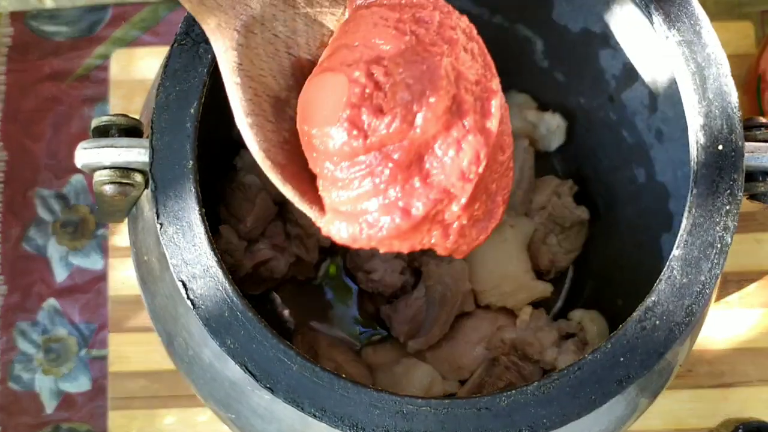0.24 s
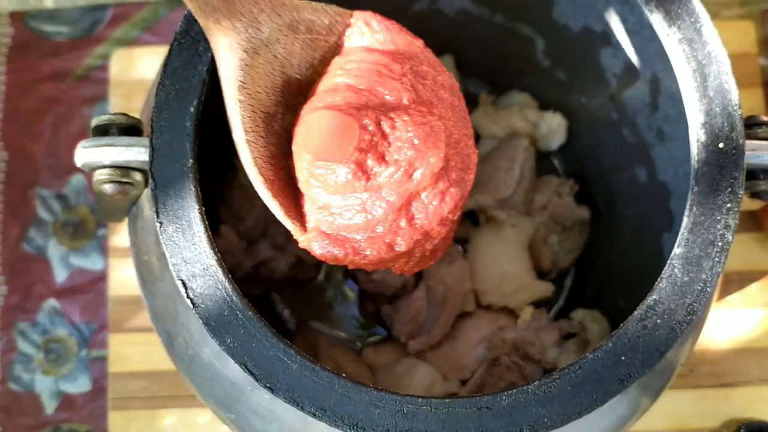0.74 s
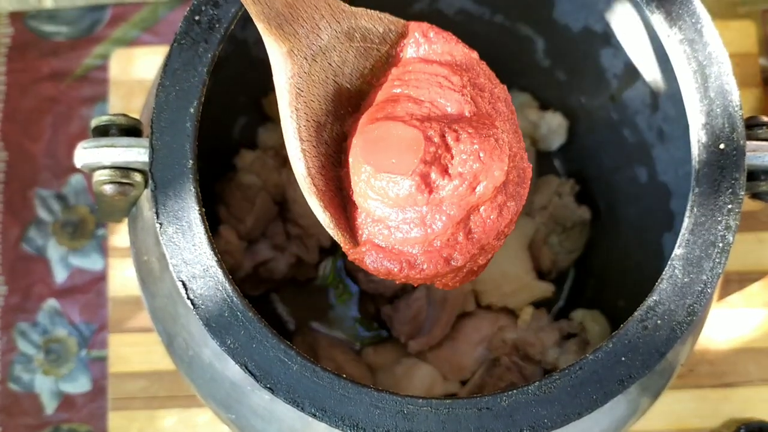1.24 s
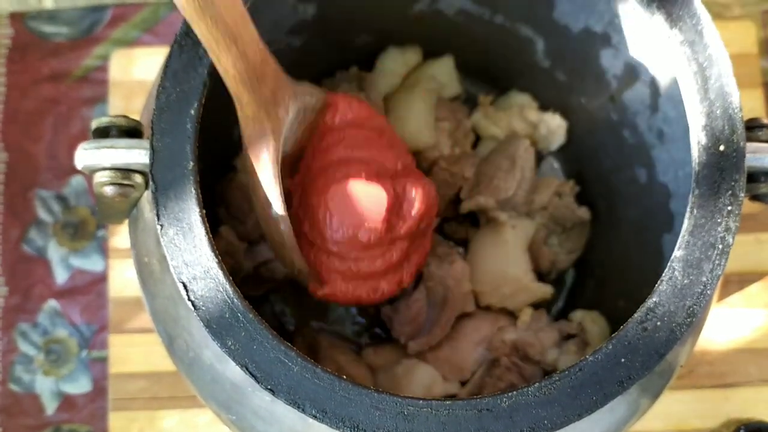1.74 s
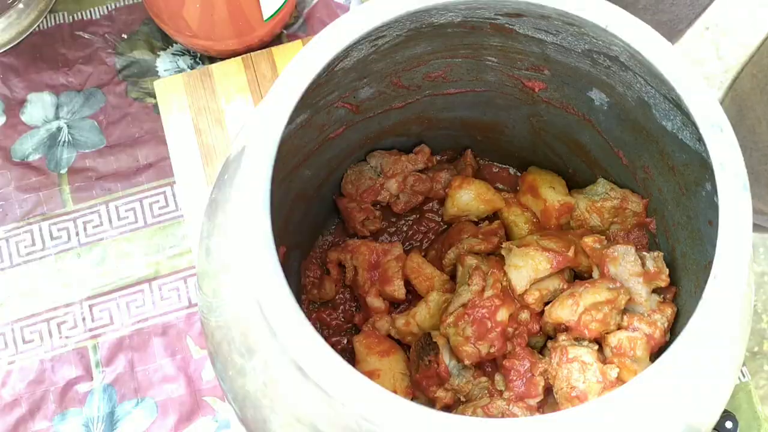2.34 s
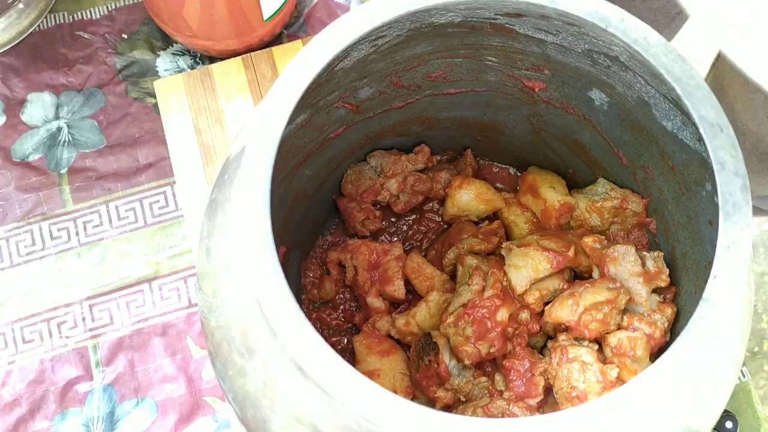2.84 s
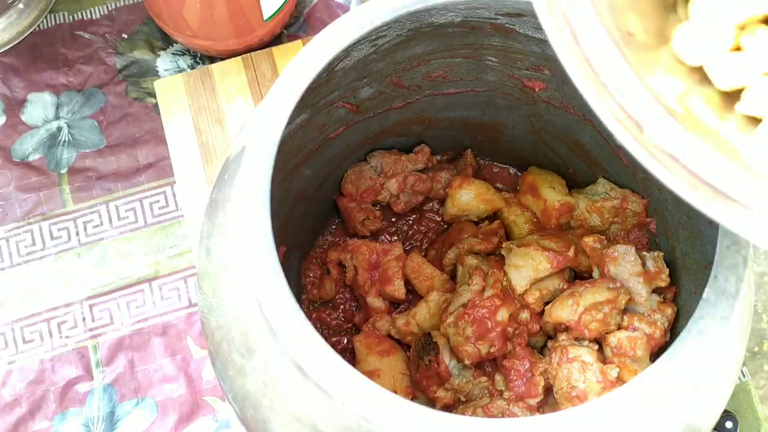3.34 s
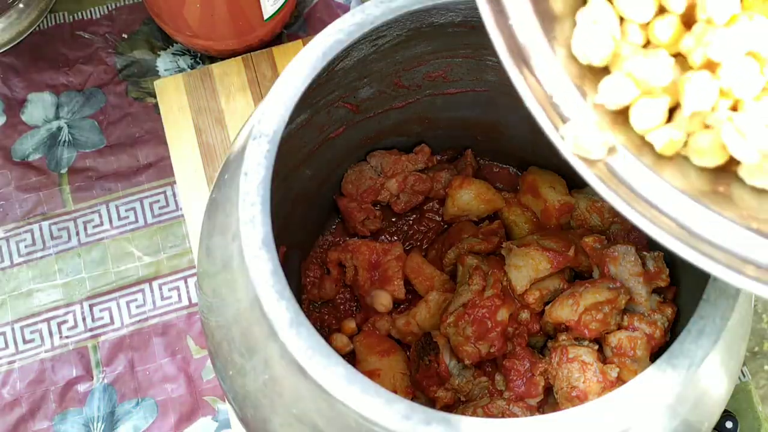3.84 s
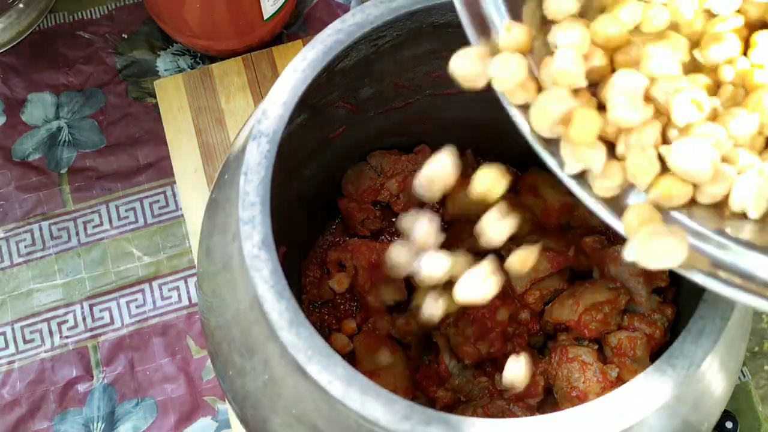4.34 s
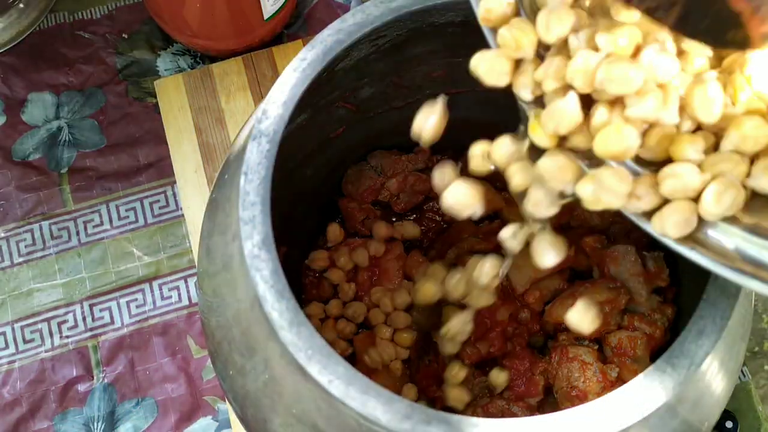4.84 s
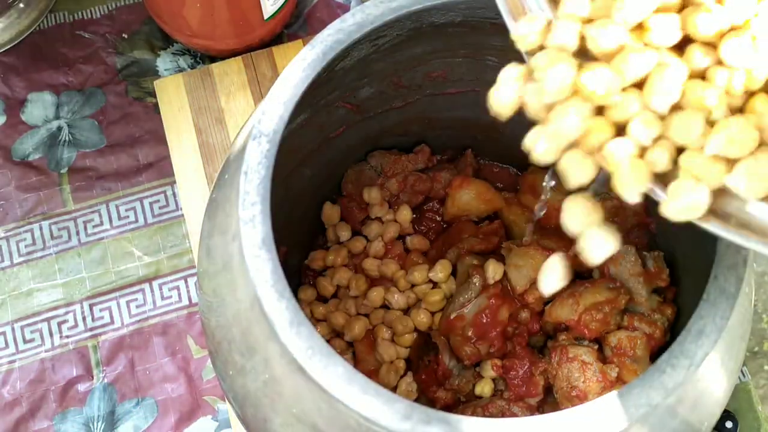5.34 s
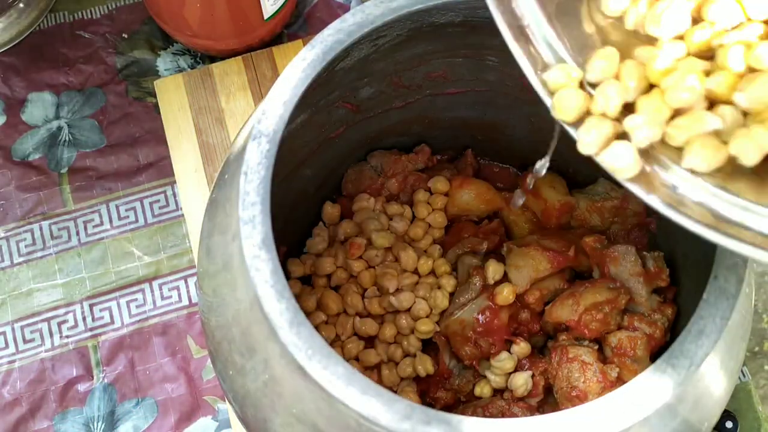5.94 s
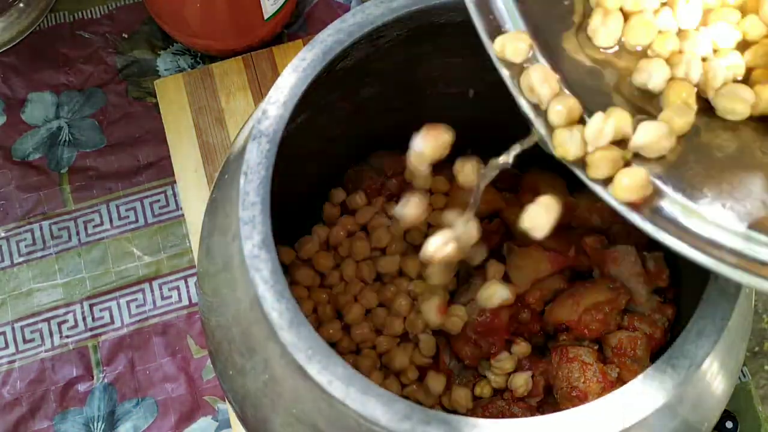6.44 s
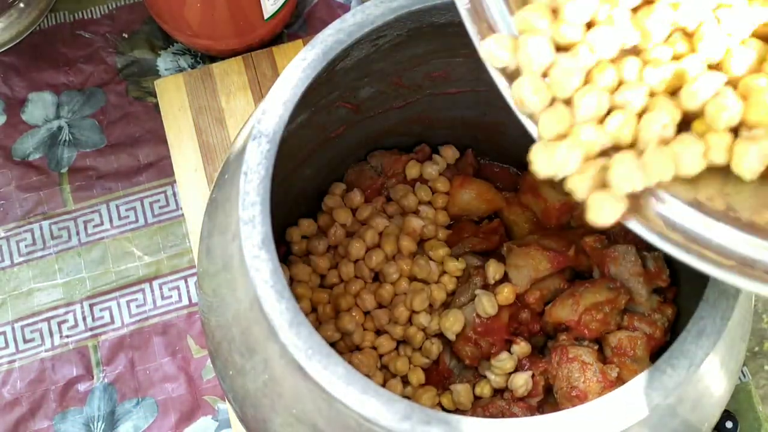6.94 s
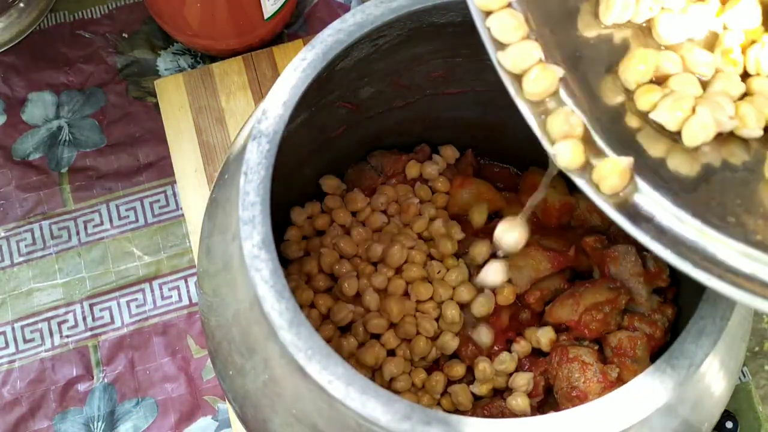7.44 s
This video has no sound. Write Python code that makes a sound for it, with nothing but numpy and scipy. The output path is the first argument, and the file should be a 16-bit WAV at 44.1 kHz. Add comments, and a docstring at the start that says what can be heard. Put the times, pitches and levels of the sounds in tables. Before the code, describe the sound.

A wooden spoon bumps dully in a heavy cooker, thick paste slaps and crackles, then wet chickpeas are scooped from a steel bowl and tumble in.

```python
"""A wooden spoon bumps dully about a pressure cooker and slaps a lump of tomato paste onto meat, which crackles.
Then it scoops soaked chickpeas from a steel bowl: it ploughs through wet peas, knocks on steel and squeaks, and
the peas tumble into the pot with dull thuds. Faint open air and a low rumble run throughout; the sound is close.
Blows are decaying modes plus a noise crack; peas, films and grit are clouds of random grains and pings,
filtered and driven by stroke envelopes."""
import sys
import numpy as np
from scipy import signal
from scipy.fft import rfft, irfft, next_fast_len
from scipy.io import wavfile
from scipy.ndimage import map_coordinates

SR = 44100
rng = np.random.default_rng(int(sys.argv[2]) if len(sys.argv) > 2 else 0)


def transcribe(signal):
    """Save signal, clipped to [-1, 1], as a 16-bit WAV file at the path in sys.argv[1]."""
    frames = np.atleast_2d(signal).T
    limited = np.clip(frames, -1, 1)
    pcm = np.round(limited * 32767).astype(np.int16)
    wavfile.write(sys.argv[1], SR, pcm)


N = 339125

# bands of a blow (thump, body, clack, crack): low_hz, high_hz
BLOW_BANDS_HZ = [(50, 300), (300, 900), (900, 2300), (2300, 11300)]
# dull blows of loaded spoon and paste at the cooker:
# start_s, strength_db (relative), favoured_hz, contact_s, left_minus_right_db
BUMPS = [(0.4991, -29.5, 760, 0.00046, 5), (1.119, -26.5, 204, 0.0019, 3.5),
         (1.413, -33.5, 556, 0.0011, 6.5), (1.419, -41, 395, 0.00022, -1), (1.434, -35, 327, 0.0012, 4),
         (1.533, -41, 337, 0.0004, -3.5), (1.576, -33, 427, 0.00035, 3.5),
         (1.587, -39.5, 397, 0.00014, 1.5), (1.627, -20.5, 279, 0.000068, 7.5),
         (1.65, -18.5, 250, 0.0024, 0), (1.668, -34.5, 950, 0.00013, 5.5), (1.681, -35, 300, 0.00086, 4),
         (1.707, -28.5, 272, 0.0041, 3), (1.727, -46, 980, 0.00045, 9), (2.056, -62.5, 845, 0.00033, 1)]
# wet peas shifting between pushes, more as the bowl tips:
# time_s, patter_drive_db (relative), wetness_drive_db (relative)
SHIFTING = [(0, -85.5, -77), (2.419, -91.5, -75.5), (2.48, -67.5, -64), (2.95, -75, -66),
            (3.4, -63.5, -70.5), (4.0, -69, -75.5), (4.65, -54.5, -66), (5.6, -64.5, -65),
            (6.1, -61.5, -65), (6.9, -58, -63.5), (7.68, -66.5, -61)]
WIDE_HZ = 834  # the ears hear alike below, differently above


def amp(db):
    """Amplitude factor of a level in dB."""
    return 10 ** (np.asarray(db) / 20)


def unit(x):
    """x scaled to rms 1."""
    return x / np.sqrt(np.mean(x ** 2) + 1e-20)


def curve(rows):
    """One value per sample from (time_s, value) rows."""
    return np.interp(np.arange(N) / SR, *np.transpose(rows))


def wobble(rate_hz):
    """Smooth random curve with rate_hz knots a second."""
    knots = rng.standard_normal(int(N * rate_hz / SR) + 4)
    return map_coordinates(knots, [np.arange(N) * rate_hz / SR])


def add(out, start_s, x):
    """Mix x into out at start_s."""
    part = out[:, round(start_s * SR):][:, :x.shape[1]]
    part += x[:, :part.shape[1]]


def coloured(x, points):
    """x through a minimum-phase filter with the gain of (hz, db) points."""
    n = x.shape[-1]
    m = 2 * next_fast_len(n // 2 + 2048)
    hz, db = np.transpose(points)
    gain_db = np.interp(np.log(np.fft.rfftfreq(m, 1 / SR) + 1), np.log(hz), db)
    cepstrum = irfft(np.log(amp(gain_db)))
    # fold the cepstrum to make the filter causal
    cepstrum[1:m // 2] *= 2
    cepstrum[m // 2 + 1:] = 0
    return irfft(rfft(x, m) * np.exp(rfft(cepstrum)), m)[..., :n]


def band(x, edges_hz, order=4):
    """Causal band-pass."""
    edges_hz = np.clip(edges_hz, 10, .49 * SR)
    return signal.sosfilt(signal.butter(order, edges_hz, 'bandpass', fs=SR, output='sos'), x)


def resonant(x, peaks):
    """x through parallel (hz, width_hz, db) resonances."""
    return sum(amp(db) * signal.lfilter(*signal.iirpeak(hz, hz / width_hz, fs=SR), x)
               for hz, width_hz, db in peaks)


def drifting(x, peaks):
    """x through (hz, width_hz, db) resonances that each glide and swell as the load moves."""
    drift_share, swing_db, changes_hz = .025, 4, 9  # scales of the random curves
    out = np.zeros_like(x)
    for hz, width_hz, db in peaks:
        # shift the gliding resonance to 0 Hz, low-pass, shift back
        turn = np.exp(2j * np.pi * hz * np.cumsum(1 + drift_share * wobble(changes_hz)) / SR)
        pole = np.exp(-np.pi * width_hz / SR)
        ringing = (turn * signal.lfilter([1 - pole], [1, -pole], x * turn.conj())).real
        out += amp(db + swing_db * wobble(changes_hz)) * ringing
    return out


def ears(pair):
    """Left and right from a common signal and a side signal that loses its bass."""
    side = signal.sosfilt(signal.butter(1, WIDE_HZ, 'highpass', fs=SR, output='sos'), pair[1])
    return np.array([pair[0] + side, pair[0] - side]) / np.sqrt(2)


def noise(n):
    """Stereo noise from white common and side signals."""
    return ears(rng.standard_normal((2, n)))


def grains(rate_hz, scatter_db):
    """Random tiny impacts, rate_hz a second, each with its own size and place."""
    sizes = amp(scatter_db * np.clip(rng.standard_normal(N), -2, 2))
    sizes = sizes * (rng.random(N) < rate_hz / SR)
    return ears(rng.standard_normal((2, N)) * sizes / np.sqrt(rate_hz))


def blips(rate_hz, centre_hz, octaves, cycles, rise):
    """Random cloud of pings, each fading over some cycles (20 ms at most) and gliding up by the share rise."""
    place, pitch_a, pitch_b, softness, side = rng.random((int(rate_hz * N / SR), 5)).T[:, :, None]
    t = np.arange(SR // 50) / SR
    hz = np.minimum(centre_hz * 2 ** (octaves * (pitch_a + pitch_b - 1)), SR / 3)
    age = t * hz / cycles
    size = amp(-9 * softness) * age * np.exp(-6 * age) * np.sqrt(hz)
    phase = 2 * np.pi * hz * t * (1 + rise * np.minimum(age, 1) / 2)
    offset = (2 * side - 1) * np.pi / 2 * np.minimum(hz / (3 * WIDE_HZ), 1)  # between the ears
    at = ((place * N).astype(int) + np.arange(len(t))).ravel()
    return unit(np.array([np.bincount(at, (size * np.sin(phase + way * offset)).ravel(), N)[:N]
                          for way in (-1, 1)]))


def clumps(rate_hz, t60_s, depth):
    """Envelope of rms 1 for things that give way in small sudden spurts, rate_hz a second."""
    starts = rng.random(N) * (rng.random(N) < rate_hz / SR)
    spurts = unit(signal.lfilter([1], [1, -amp(-60 / (t60_s * SR))], starts))
    return unit(1 - depth + depth * spurts)


def strokes(rows, rise_s, t60_s):
    """Power-summed envelope of (start_s, length_s, db) movements: each rises, holds and dies away."""
    power = np.zeros((1, N))
    for start_s, length_s, db in rows:
        t = np.arange(int((length_s + 2 * t60_s) * SR)) / SR
        fade = amp(db - 60 * np.maximum(t - length_s, 0) / t60_s)
        envelope = np.minimum(t / rise_s, 1) * fade
        add(power, start_s, envelope[None] ** 2)
    return np.sqrt(power[0])


def after_bumps(t60_s):
    """Envelope of what each bump sets shaking, in step with its strength."""
    return strokes([(start_s, 0, db) for start_s, db, *_ in BUMPS], rise_s=0.0091, t60_s=t60_s)


def in_pot(x):
    """x with the short, hollow echo of the cooker's walls (decaying noise), at rms 1."""
    wall_db, wall_t60_s = -4, .045
    t = np.arange(SR // 20) / SR
    walls = amp(-60 * t / wall_t60_s) * rng.standard_normal(len(t))
    walls = walls / np.linalg.norm(walls)
    return unit(x + amp(wall_db) * signal.fftconvolve(x, [walls])[:, :N])


def nearness(hz, centre_hz):
    """1 at the centre, falling to near 0 about half an octave away."""
    return np.exp(-(np.log(hz / centre_hz) / .22) ** 2)


def ring(modes, favoured_hz, favour_db):
    """Decaying modes at new strengths; the point of contact favours those near one frequency."""
    t = np.arange(SR // 3) / SR
    hz, db, t60_s = np.transpose(modes)[:, :, None]
    size = amp(db + rng.normal(0, 1.5, db.shape) + favour_db * nearness(hz, favoured_hz))
    # higher modes reach the ears out of step
    offset = np.minimum(hz / WIDE_HZ, 1.6) / 2 * rng.standard_normal(hz.shape)
    phase = rng.uniform(0, 2 * np.pi, hz.shape) + np.array([offset, -offset])
    return np.sum(size * amp(-60 * t / t60_s) * np.sin(2 * np.pi * hz * t + phase), axis=1)


def softened(bands_db, contact_s):
    """Band levels of a blow: the longer the contact, the less treble."""
    centres_hz = np.sqrt(np.prod(BLOW_BANDS_HZ, axis=1))
    return np.array(bands_db) - 10 * np.log10(1 + (centres_hz * contact_s) ** 4)


def blow(ringing, levels_db, pan_db, crack_db, crack_t60_s, tail_db, tail_t60_s):
    """One contact: ringing over a noise crack, levelled in four broad bands."""
    t = np.arange(ringing.shape[1]) / SR
    crack = amp(crack_db - 60 * t / crack_t60_s) + amp(tail_db - 60 * t / tail_t60_s)
    x = ringing + crack * noise(len(t))
    x = x * (1 - np.exp(-t / 0.0003))
    parts = [band(x, edges_hz) for edges_hz in BLOW_BANDS_HZ]
    attack = SR // 80  # each band's level is set over the first 12.5 ms
    levelled = sum(amp(db) * p / p[:, :attack].std() for db, p in zip(levels_db, parts))
    return amp([[pan_db / 2], [-pan_db / 2]]) * levelled


def background(pushing):
    """Faint open air and the low rumble of jostled pot and table: coloured noise under envelopes."""
    # spectrum of the air: freq_hz, gain_db
    air_colour = [(24, -41.5), (40, -8.5), (60, -23.5), (108, -19), (287, -28.5), (2220, -37.5),
                  (4000, -37.5), (8520, -42), (15500, -41.5)]
    # spectrum of the rumble: freq_hz, gain_db
    rumble_colour = [(20, -35), (40, -15), (58, 1), (80, -6), (120, -9.5), (250, -24.5), (1000, -47.5)]
    # pot and table are jostled: start_s, length_s, level_db
    jostles = [(0.64, 0.059, -49.5), (1.79, 0.11, -55), (2.04, 0.081, -56.5), (2.19, 0.095, -59.5),
               (3.78, 0.34, -61), (4.47, 0.12, -55.5), (5.77, 0.22, -50.5), (6.76, 0.23, -56),
               (7.44, 0.083, -58)]
    shake_db, shake_t60_s = -12, 0.31  # the table shakes after each bump
    push_shake_db, floor_db = -17.5, -72  # a push's rumble against its drive; steady rumble
    air = amp(-72.5) * unit(coloured(noise(N), air_colour))
    rumble = unit(coloured(noise(N) + rng.standard_normal((2, N)), rumble_colour))
    causes = [strokes(jostles, rise_s=0.023, t60_s=0.39),
              amp(shake_db) * after_bumps(shake_t60_s),
              amp(push_shake_db) * pushing,
              np.full(N, amp(floor_db))]
    return air + np.linalg.norm(causes, axis=0) * rumble


def spoon_on_cooker():
    """Soft, heavy bumps ring the cooker; dull rubbing, a few gritty catches, later more dull rubbing of the
    spoon."""
    # modes of the heavy cooker: freq_hz, level_db (relative), t60_s
    cooker_modes = [(71.9, -1.5, 0.038), (133, 3, 0.093), (183, 0.5, 0.09), (249, 0, 0.066),
                    (303, -14.5, 0.018), (390, -3, 0.069), (487, -5, 0.018), (610, -12, 0.068),
                    (753, -8, 0.027), (917, -8.5, 0.024), (1626, -6.5, 0.029), (3660, -19.5, 0.051),
                    (5740, 0.5, 0.017), (7700, -14, 0.024), (10300, -7, 0.031)]
    # answer to a perfectly hard blow, one value a band: level_db (relative)
    cooker_bands_db = [-5.5, -1.5, -5, -7]
    # resonances of the grit and scratches: freq_hz, width_hz, gain_db
    grit_peaks = [(698, 250, -2), (1210, 36, -2), (1850, 450, 2)]
    # spectrum of the dull drone: freq_hz, gain_db
    dull_colour = [(30, -15.5), (70, 3), (170, 3), (300, -3.5), (500, -9), (850, -20), (1900, -38.5),
                   (2600, -33), (15000, -62)]
    # dull rubbing of the spoon, early on and later again as it rubs along a rim: start_s, length_s, level_db
    rubs = [(0.56, 0.171, -50), (0.74, 0.14, -51), (1.51, 0.05, -40), (4.46, 0.11, -57),
            (5.25, 0.0513, -53.5), (5.8, 0.21, -60)]
    # spoon catches on the rim and slips: start_s, scratch_peak_db
    catches = [(0.696, -55), (0.756, -54), (0.792, -55), (0.837, -47), (0.861, -50)]
    shudder_db, shudder_t60_s = -16.5, 0.27  # the spoon judders on after each bump
    handling_db = -74  # the hand's faint rubbing on the spoon
    grit_db, thud_db = -19.5, 5.5  # grit against drone; thud of a catch against its scratch
    grit_edges_hz = (500, 2000)

    dull = strokes(rubs, rise_s=0.052, t60_s=0.05) + amp(shudder_db) * after_bumps(shudder_t60_s)
    dull = dull * clumps(90, t60_s=.08, depth=.25)
    drone = unit(coloured(grains(2500, scatter_db=0), dull_colour))
    grit = unit(resonant(band(grains(1000, scatter_db=3), grit_edges_hz, order=5), grit_peaks))
    out = np.hypot(dull, amp(handling_db)) * drone
    out += amp(grit_db) * dull * grit

    t = np.arange(SR // 20) / SR
    for start_s, peak_db in catches:
        scratch = resonant(band(amp(-60 * t / 0.006) * noise(len(t)), grit_edges_hz, order=5), grit_peaks)
        thud = band(amp(-60 * t / 0.023) * noise(len(t)), (130, 260), order=2)
        both = scratch / abs(scratch).max() + amp(thud_db) * thud / abs(thud).max()
        add(out, start_s, amp(peak_db) * both)

    for start_s, db, favoured_hz, contact_s, pan_db in BUMPS:
        ringing = ring(cooker_modes, favoured_hz, favour_db=11.5)
        levels_db = db + softened(cooker_bands_db, contact_s)
        bump = blow(ringing, levels_db, pan_db,
                    crack_db=-1.5, crack_t60_s=0.015, tail_db=-2.0, tail_t60_s=0.07)
        add(out, start_s, amp(-5.0) * bump)
    return out


def splat():
    """After the slap the paste spreads over the meat in crackling spurts of grains under two fades."""
    # spectrum of the spreading paste: freq_hz, gain_db
    splat_colour = [(200, -2), (450, 0.5), (1050, -3.5), (1600, -8.5), (2600, 5), (4500, 0.5), (6000, -2),
                    (9500, -2), (16000, -6.5)]
    slap_s, burst_db, spread_db = 1.63, -46, -39
    burst = strokes([(slap_s, 0, burst_db)], rise_s=0.0044, t60_s=0.3)  # paste squirts as it lands
    spread = strokes([(slap_s, 0, spread_db)], rise_s=0.024, t60_s=0.66)  # and goes on spreading
    squelch = clumps(110, t60_s=.04, depth=.4) * in_pot(grains(4000, scatter_db=1))
    return (burst + spread) * unit(coloured(squelch, splat_colour))


def wetness(pushing):
    """Liquid films crackle densely, tiny bubbles ping in a strong swish, larger films smack at their own pitch."""
    # spectrum of the crackle: freq_hz, gain_db
    wet_colour = [(300, -19.5), (1400, -3), (2300, -10), (4000, -2), (5500, -2.5), (9500, 2), (12000, -4.5),
                  (15000, -8.5), (17000, -24)]
    # wet food slides and settles in the pot: start_s, length_s, drive_db (relative)
    slides = [(0.96, 0.083, -68), (2.45, 0.063, -61.5), (2.56, 0.036, -61), (4.5, 0.077, -55),
              (4.985, 0.18, -53), (5.62, 0.099, -53), (5.7, 0.19, -47), (6.41, 0.262, -53.5),
              (6.48, 0.11, -48.5), (7.34, 0.19, -49.5)]
    # wet smacks as sticky surfaces meet or part, plus the sharp treble ticks of some pea clacks and the bright
    # top of the knock at 6.71 s: start_s, peak_db, pitch_hz
    smacks = [(1.1205, -23, 7500), (1.1201, -26.5, 3900), (1.627, -21, 4160), (1.668, -32, 5560),
              (1.981, -44.5, 9300), (3.658, -33.5, 3010), (3.818, -39, 4200), (3.8576, -31.5, 6670),
              (4.5243, -25.5, 10200), (4.769, -40, 12900), (4.9276, -37, 6000), (5.676, -28, 11100),
              (5.782, -24.5, 4300), (5.856, -23, 3500), (6.402, -31.5, 9600), (6.442, -31.5, 9150),
              (6.493, -30, 4230), (6.7075, -19.5, 6700), (7.399, -28.5, 6300), (7.4062, -19, 10300),
              (7.5, -28, 10800), (7.6197, -16, 8700)]
    push_wet_db = -14.5  # squelch of a push against its drive
    causes = [strokes(slides, rise_s=0.021, t60_s=0.11),
              amp(push_wet_db) * pushing,
              amp(curve([(time_s, db) for time_s, _, db in SHIFTING]))]
    level_db = 20 * np.log10(np.linalg.norm(causes, axis=0))
    crackle = unit(coloured(in_pot(grains(5000, scatter_db=2)), wet_colour))
    bubbles = blips(1100, centre_hz=4600, octaves=2, cycles=45, rise=.04)
    churn = amp(.35 * (level_db - level_db.max()))  # bubbles fade faster than the crackle
    out = amp(level_db + 2.16 * wobble(55)) * (crackle + amp(-0.5) * churn * bubbles)

    t = np.arange(SR // 12) / SR
    for start_s, peak_db, hz in smacks:
        burst = amp(-60 * t / 0.035) * (1 - np.exp(-t / 0.00022)) * noise(len(t))
        smack = band(burst, (hz / 1.247, hz * 1.108), order=2)
        smack = smack + amp(-10.5) * band(burst, (2500, 11500), order=2)
        add(out, start_s, amp(peak_db) * smack / abs(smack).max())
    return out


def squeaks():
    """The wet spoon drags on the steel with a thin, rasping note: narrow-band noise."""
    # squeaks on the bowl: start_s, length_s, level_db, pitch_hz
    squeak_rows = [(3.044, 0.1, -64, 5420), (3.797, 0.064, -60, 1100), (4.603, 0.3, -67, 1087),
                   (6.437, 0.057, -52.5, 1020), (6.603, 0.11, -59, 1030)]
    width = .028  # share of the pitch to either side
    out = np.zeros((2, N))
    for start_s, length_s, db, hz in squeak_rows:
        rasp = unit(band(noise(N), (hz * (1 - width), hz * (1 + width)), order=2))
        out += strokes([(start_s, length_s, db)], rise_s=.02, t60_s=0.088) * rasp
    return out


def stray_peas(rolling):
    """Random further clacks (start_s, level_db, pitch_hz), as strong as the peas are rolling."""
    pour_start_s, strays_hz = 2.45, 14  # the chickpeas begin to move; strays a second
    stray_db, scatter_db = 3, 8.5  # against the rolling drive, give or take
    span_s = N / SR - pour_start_s
    when, size, pitch = rng.random((int(strays_hz * span_s), 3)).T
    start_s = pour_start_s + span_s * when
    drive_db = 20 * np.log10(rolling[(start_s * SR).astype(int)])
    level_db = drive_db + stray_db + scatter_db * (2 * size - 1)
    return list(zip(start_s, level_db, 1050 * 2 ** pitch))


def chickpeas(pushing):
    """Peas roll in clumps of soft pocks that set the bowl's shifting hollow humming; single ones clack too."""
    # single chickpeas, loud and faint, hit the bowl and each other: start_s, level_db (relative), pitch_hz
    single_peas = [(2.467, -51.5, 1470), (2.495, -52.5, 452), (2.518, -56, 430), (2.58, -50, 1190),
                   (3.191, -42.5, 1440), (3.247, -54, 534), (3.322, -45, 560), (3.517, -38.5, 1130),
                   (3.551, -33.5, 1090), (3.58, -35.5, 1110), (3.618, -41, 850), (3.656, -29.5, 1300),
                   (3.668, -37, 1040), (3.726, -50.5, 1350), (4.067, -39.5, 1140), (4.08, -44, 604),
                   (4.093, -30, 1840), (4.129, -35.5, 1080), (4.174, -41, 562), (4.203, -48.5, 1060),
                   (4.241, -55, 540), (4.304, -47, 1200), (4.349, -46.5, 533), (4.44, -41.5, 1250),
                   (4.508, -35.5, 1830), (4.551, -41.5, 2500), (4.766, -40.5, 1210), (4.852, -41, 1220),
                   (4.924, -46, 1150), (5.016, -33.5, 1210), (5.067, -34.5, 1750), (5.179, -41.5, 692),
                   (5.28, -44.5, 1070), (5.333, -56, 454), (5.354, -45, 1870), (5.38, -33, 1340),
                   (5.515, -41.5, 1160), (5.675, -36.5, 2790), (5.706, -37, 1660), (5.769, -35.5, 1060),
                   (5.808, -38.5, 1390), (5.929, -40, 1990), (6.113, -44, 530), (6.329, -42.5, 437),
                   (6.362, -38.5, 1130), (6.794, -40.5, 1300), (6.832, -47, 443), (6.879, -45, 530),
                   (6.945, -42.5, 471), (7.097, -41.5, 515), (7.145, -38, 1320), (7.19, -42.5, 470),
                   (7.203, -39, 1280), (7.288, -42, 490)]
    # spectrum of the patter: freq_hz, gain_db
    pea_colour = [(100, -17.5), (250, 1.5), (340, 8.5), (500, -1.5), (720, 3), (860, -5), (1060, 0),
                  (1330, -4.5), (1680, -20), (2000, -10), (3000, -15.5), (6000, -37.5), (15000, -27)]
    # bowl's hollow answer to the peas: freq_hz, width_hz, gain_db
    hollow_peaks = [(495, 70, 0), (1080, 70, -4), (1320, 50, 1), (1980, 60, -3), (2500, 60, -5)]
    clack_cycles, tick_db = 33.4, -15  # cycles for a contact to fall 60 dB; tick against clack
    rolling = np.hypot(pushing, amp(curve([(time_s, db) for time_s, db, _ in SHIFTING])))
    patter = unit(coloured(grains(900, scatter_db=0), pea_colour))
    pocks = blips(160, centre_hz=1300, octaves=1.2, cycles=36, rise=.06)
    hollow = unit(drifting(band(grains(420, scatter_db=1), (350, 2900), order=3), hollow_peaks))
    mix = amp(-7.5) * patter + amp(-7) * pocks + amp(-2.5) * hollow
    out = rolling * clumps(60, t60_s=.11, depth=.4) * mix

    t = np.arange(SR // 10) / SR
    for start_s, db, hz in single_peas + stray_peas(rolling):
        fade = amp(-60 * t * hz / clack_cycles) + amp(-10 - 60 * t / 0.11)
        contact = fade * (1 - np.exp(-t / 0.00026)) * noise(len(t))
        clack = unit(band(contact, (hz / 1.15, hz * 1.081), order=2))  # each contact has its own pitch
        clack = clack + amp(-9) * unit(coloured(contact, pea_colour))
        clack = clack + amp(-5) * unit(resonant(contact, hollow_peaks))
        tick = band(contact, (2100, 5500), order=2)
        both = clack / abs(clack).max() + amp(tick_db) * tick / abs(tick).max()
        add(out, start_s, amp(db + 2.0) * both)
    return out


def spoon_on_bowl():
    """Mostly hard, short knocks of wood on steel, one soft, dull bloop; load retunes modes, spoon mutes some."""
    # spoon knocks on the bowl (the long contact is the bloop):
    # start_s, strength_db (relative), favoured_hz, muted_hz, contact_s, left_minus_right_db
    knocks = [(3.0134, -31.5, 1210, 740, 0.00055, 3.5), (3.9047, -36.5, 480, 750, 0.00038, 2),
              (5.112, -27, 4600, 710, 0.000034, 1), (5.433, -33, 1110, 590, 0.0005, 4.5),
              (5.4397, -40, 1160, 560, 0.00035, -1), (5.931, -50.5, 278, 690, 0.00038, -3),
              (6.7066, -24, 670, 2460, 0.00036, -3), (6.7114, -28, 520, 2500, 0.00036, -2.5),
              (7.002, -37.5, 496, 1000, 0.0018, -1), (7.5792, -23.5, 2330, 2020, 0.00032, 2.5),
              (7.5862, -26, 410, 3320, 0.00034, -1), (7.645, -43.5, 396, 1230, 0.00023, -1)]
    # modes of the steel bowl, damped by its load: freq_hz, level_db (relative), t60_s
    bowl_modes = [(250, -15, 0.072), (421, -2.5, 0.093), (514, 8, 0.036), (696, 2, 0.043),
                  (843, -13, 0.037), (1055, -1.5, 0.033), (1221, 3, 0.055), (1361, 4, 0.054),
                  (1497, 1, 0.061), (1890, -6, 0.055), (2490, -11.5, 0.21), (2910, -5.5, 0.053),
                  (3320, 3, 0.04), (3726, 3.5, 0.034), (4430, 0, 0.011), (4780, 2.5, 0.025),
                  (5880, 3, 0.023), (6590, 0.5, 0.035), (9210, -1.5, 0.039)]
    # answer to a perfectly hard blow, one value a band: level_db (relative)
    bowl_bands_db = [-10, 0.5, -4.5, 2.8]
    mute_db = -14.5  # modes held by the spoon
    detune, rattle_db = .015, 2.5  # scales: loose peas shift each mode (share) and roughen the ring
    out = np.zeros((2, N))
    for start_s, db, favoured_hz, muted_hz, contact_s, pan_db in knocks:
        modes = [(hz * (1 + detune * rng.uniform(-1.3, 1)), level_db + mute_db * nearness(hz, muted_hz), t60_s)
                 for hz, level_db, t60_s in bowl_modes]
        ringing = ring(modes, favoured_hz, favour_db=14.0)
        ringing = ringing * amp(rattle_db * wobble(234)[:ringing.shape[1]])
        levels_db = db + softened(bowl_bands_db, contact_s)
        knock = blow(ringing, levels_db, pan_db,
                     crack_db=12, crack_t60_s=.018, tail_db=-8, tail_t60_s=.11)
        add(out, start_s, amp(-2.4) * knock)
    return out


def scene():
    """First the paste, then the chickpeas; each push of the spoon drives patter, squelch and rumble."""
    # spoon pushes through the peas: start_s, length_s, drive_db (relative)
    pushes = [(2.56, 0.042, -62.5), (3.17, 0.05, -62.5), (3.49, 0.17, -51.5), (4.05, 0.1, -53),
              (4.5, 0.095, -52.5), (4.79, 0.1, -54.5), (5.11, 0.055, -49), (5.33, 0.12, -47.5),
              (5.48, 0.21, -50.5), (5.74, 0.11, -49.5), (5.91, 0.05, -47), (6.07, 0.078, -51.5),
              (6.28, 0.27, -49.5), (6.82, 0.032, -57), (7.13, 0.11, -50.5), (7.25, 0.23, -51),
              (7.6, 0.085, -52.5)]
    pushing = strokes(pushes, rise_s=0.018, t60_s=0.18)
    cooker = spoon_on_cooker() + splat()
    bowl = chickpeas(pushing) + spoon_on_bowl() + squeaks()
    return background(pushing) + cooker + wetness(pushing) + bowl


def record(dry):
    """A small microphone loses the deepest bass; a steep low-pass ends the treble at 15.75 kHz."""
    heard = signal.sosfilt(signal.butter(3, 40, 'highpass', fs=SR, output='sos'), dry)
    return signal.sosfilt(signal.ellip(10, .1, 90, 15750, fs=SR, output='sos'), heard)


dry = scene()
out = record(dry)
transcribe(out)
```